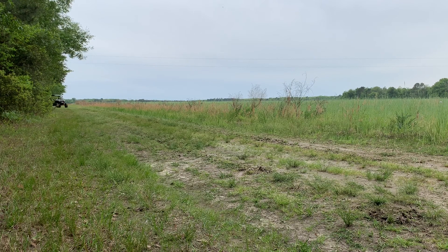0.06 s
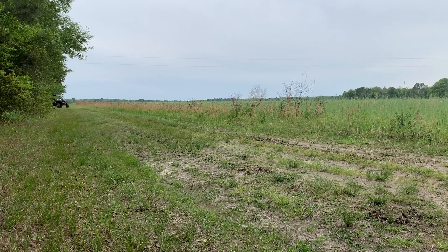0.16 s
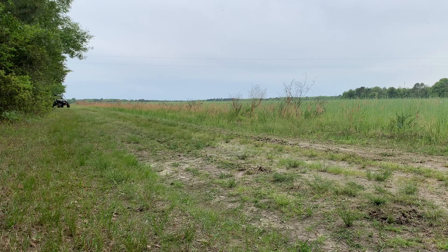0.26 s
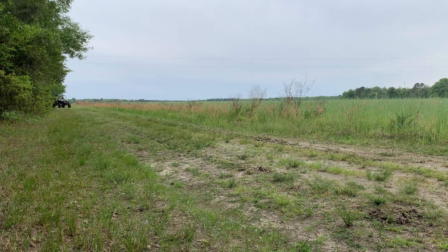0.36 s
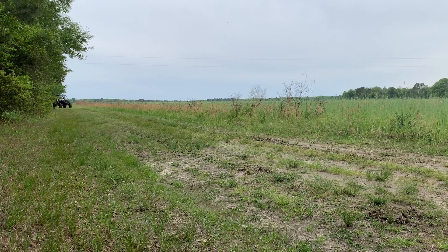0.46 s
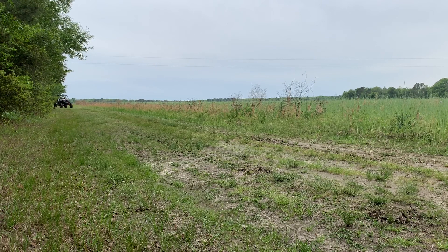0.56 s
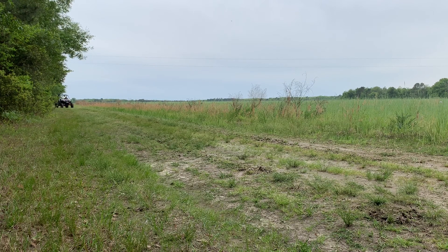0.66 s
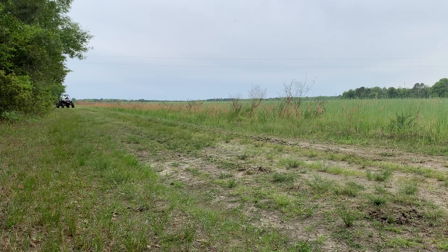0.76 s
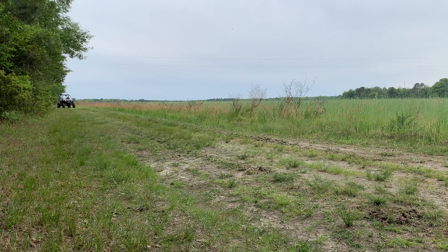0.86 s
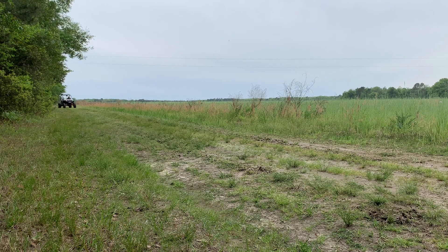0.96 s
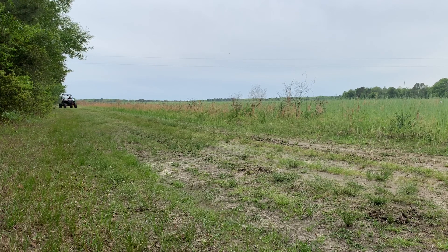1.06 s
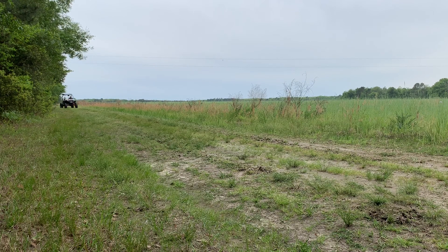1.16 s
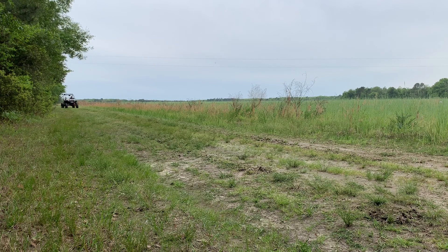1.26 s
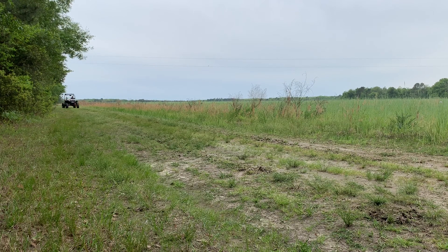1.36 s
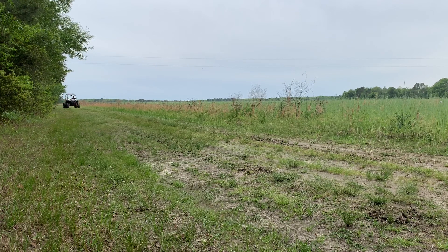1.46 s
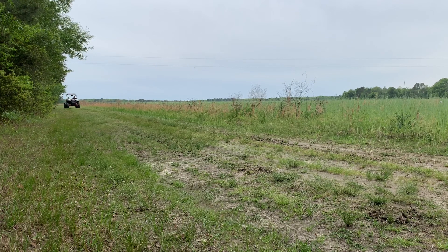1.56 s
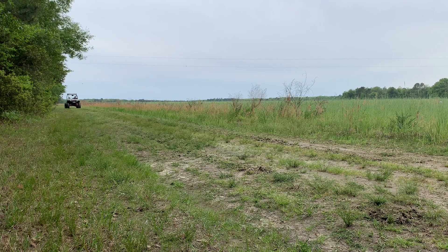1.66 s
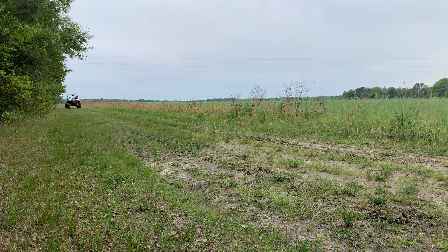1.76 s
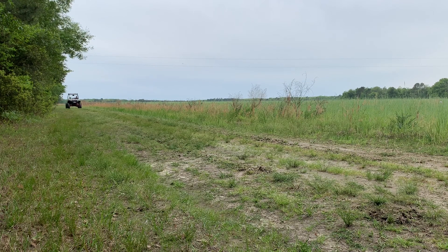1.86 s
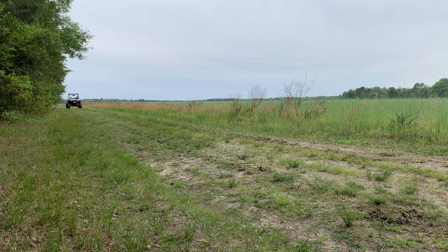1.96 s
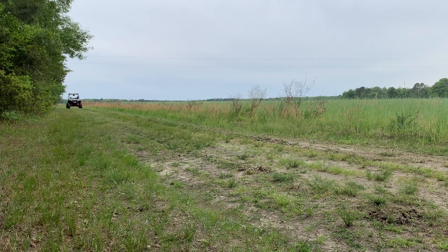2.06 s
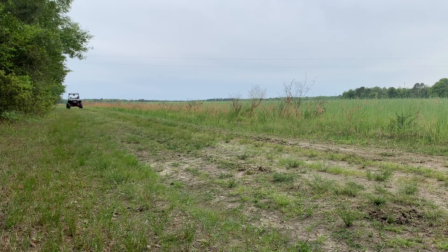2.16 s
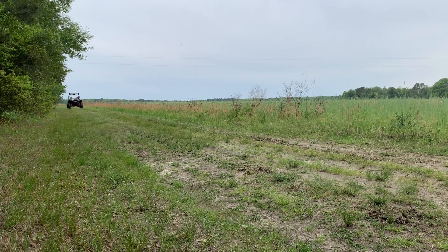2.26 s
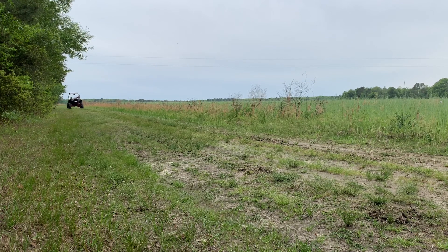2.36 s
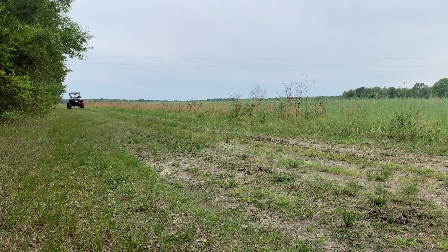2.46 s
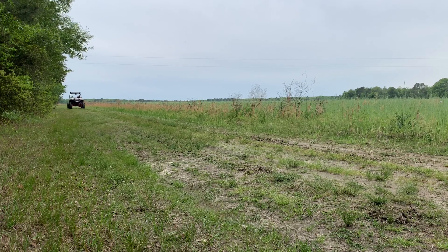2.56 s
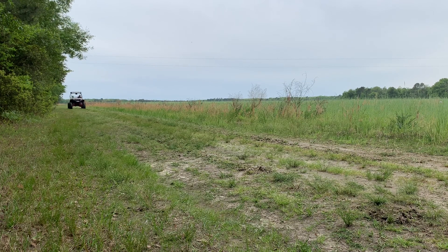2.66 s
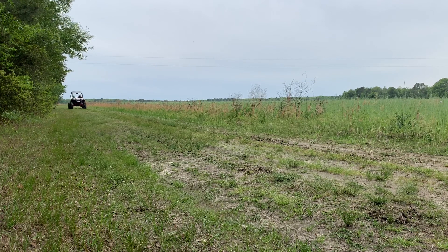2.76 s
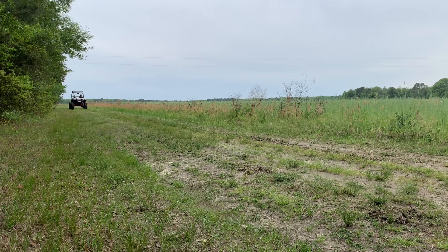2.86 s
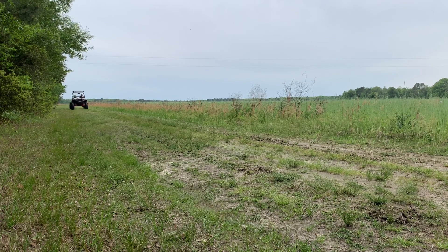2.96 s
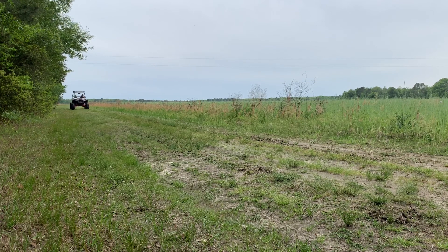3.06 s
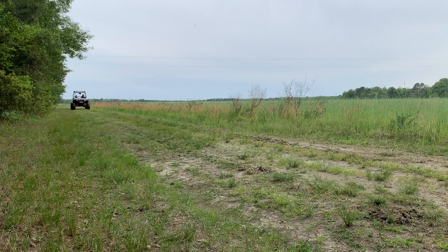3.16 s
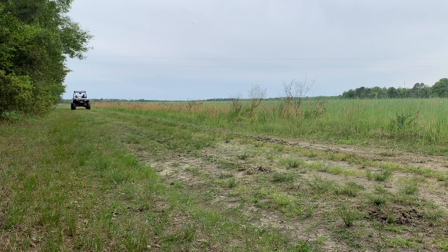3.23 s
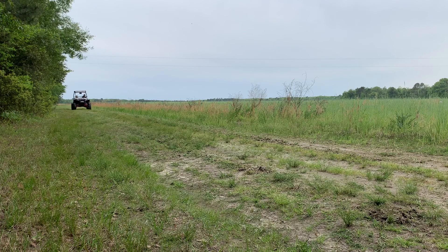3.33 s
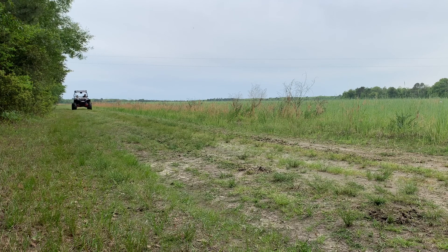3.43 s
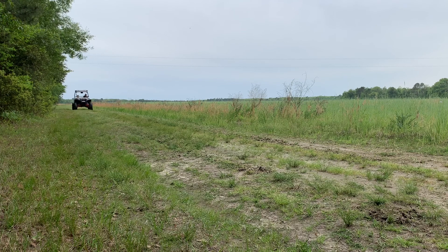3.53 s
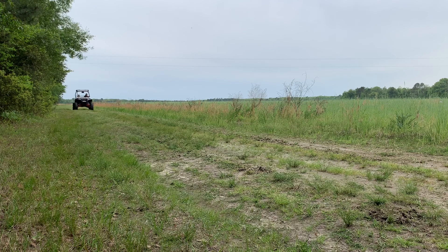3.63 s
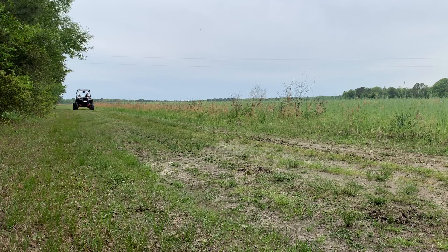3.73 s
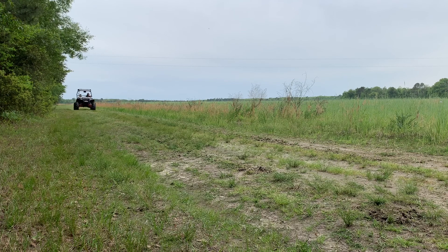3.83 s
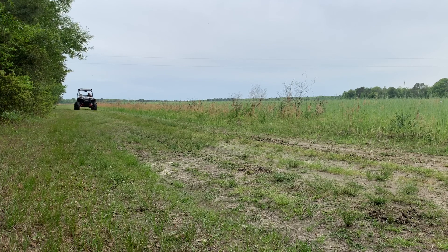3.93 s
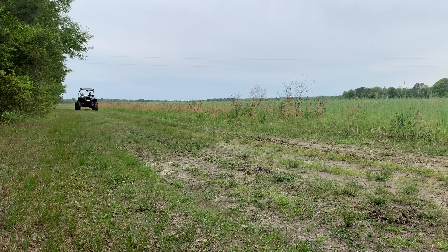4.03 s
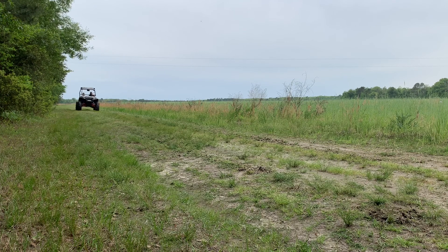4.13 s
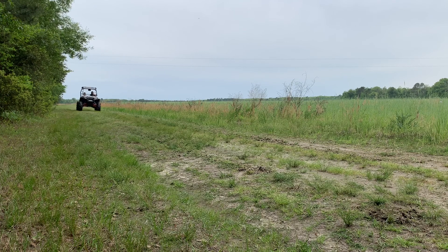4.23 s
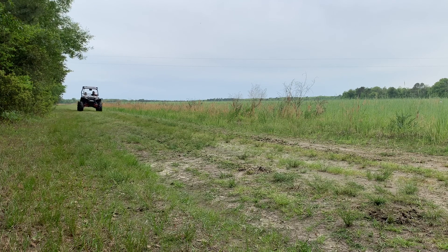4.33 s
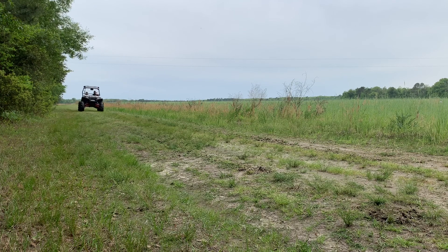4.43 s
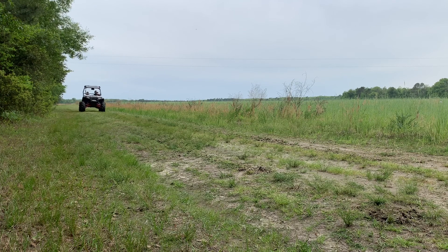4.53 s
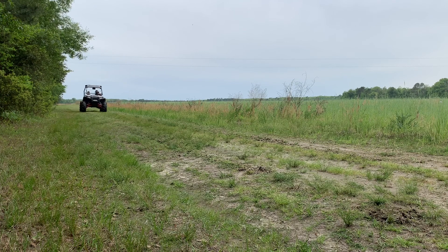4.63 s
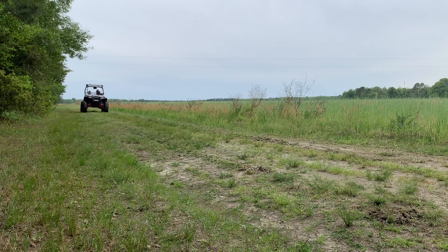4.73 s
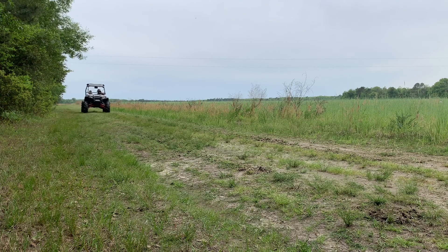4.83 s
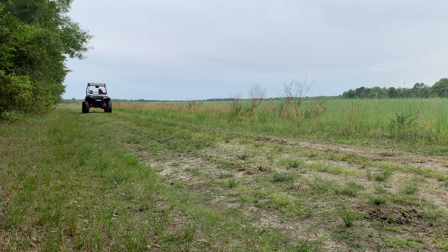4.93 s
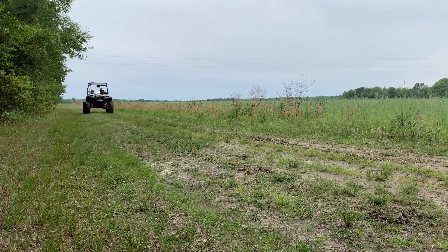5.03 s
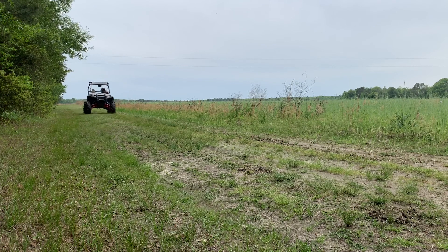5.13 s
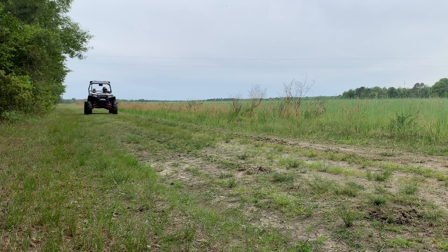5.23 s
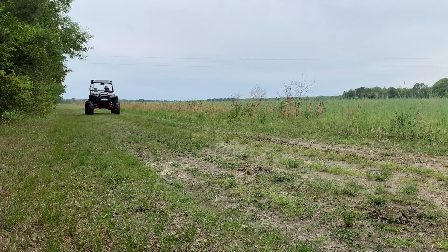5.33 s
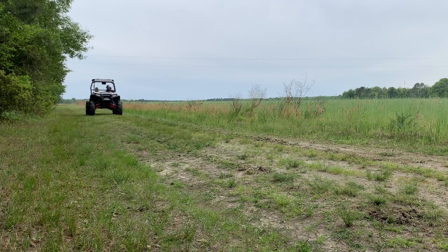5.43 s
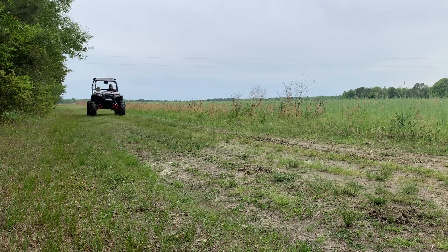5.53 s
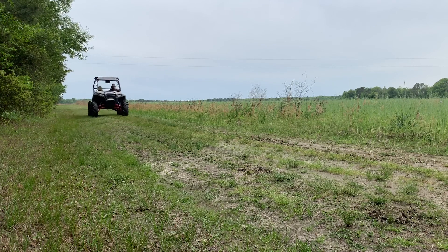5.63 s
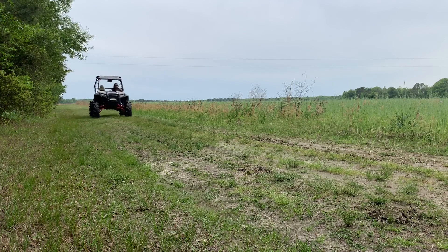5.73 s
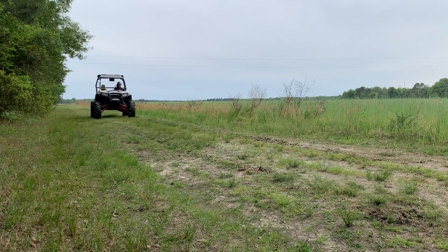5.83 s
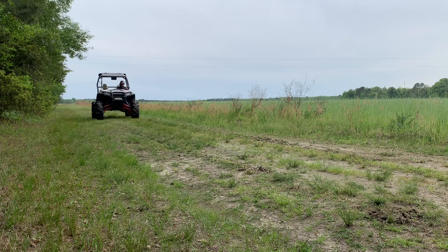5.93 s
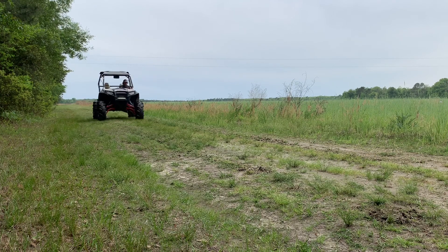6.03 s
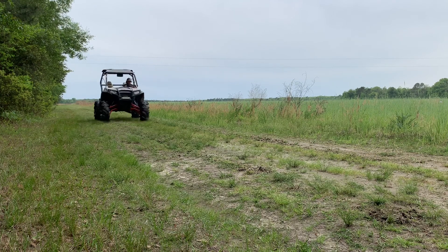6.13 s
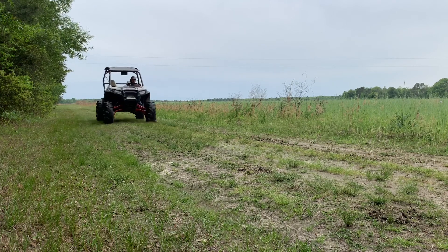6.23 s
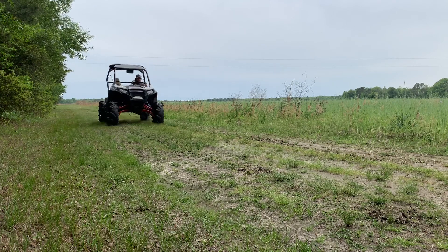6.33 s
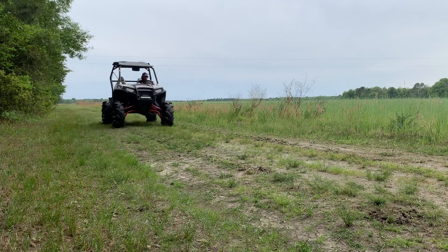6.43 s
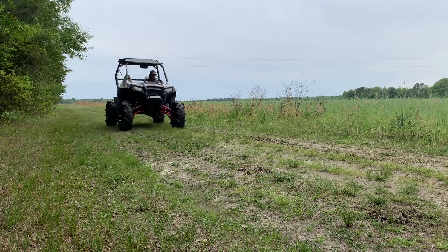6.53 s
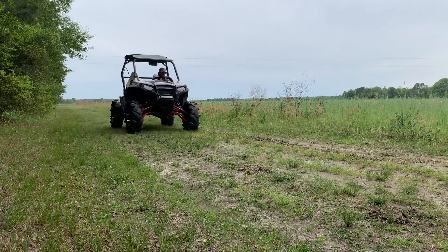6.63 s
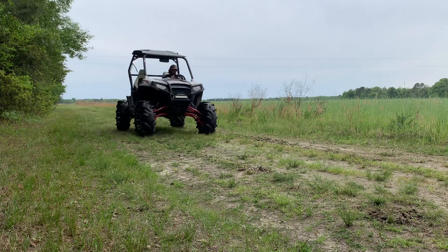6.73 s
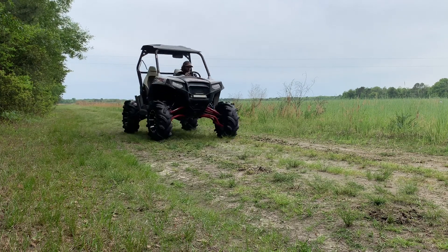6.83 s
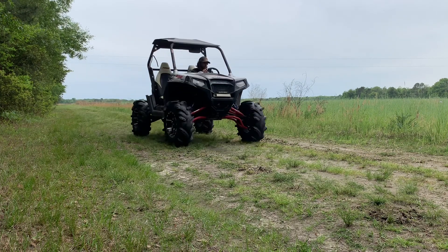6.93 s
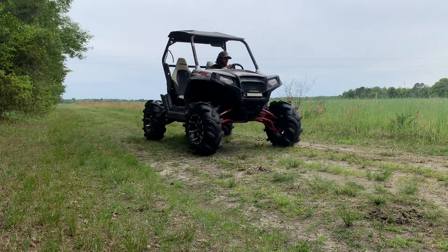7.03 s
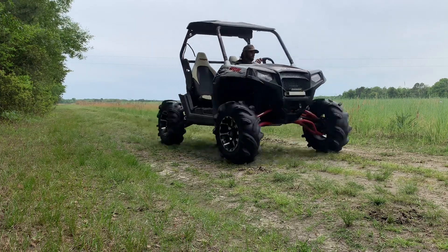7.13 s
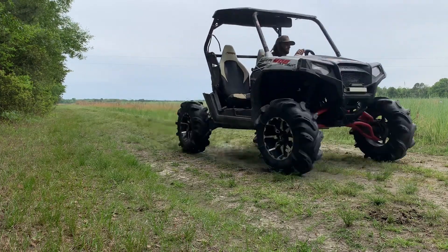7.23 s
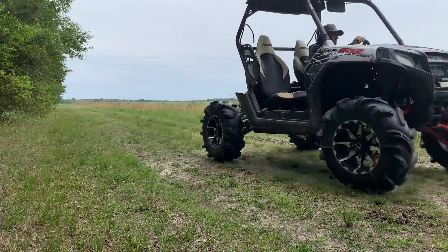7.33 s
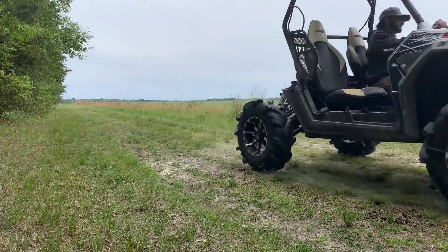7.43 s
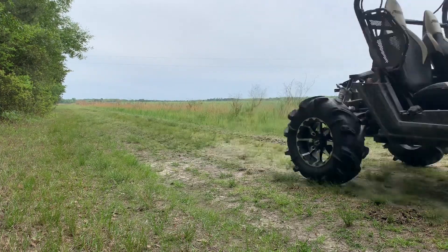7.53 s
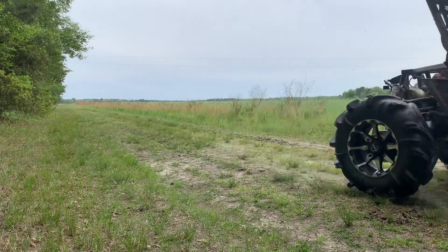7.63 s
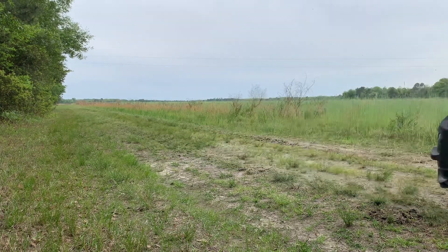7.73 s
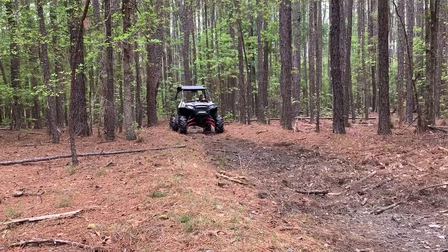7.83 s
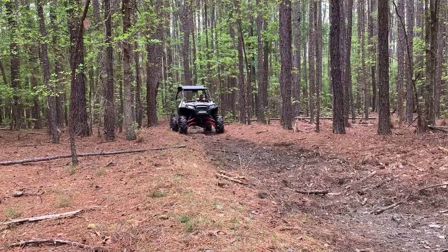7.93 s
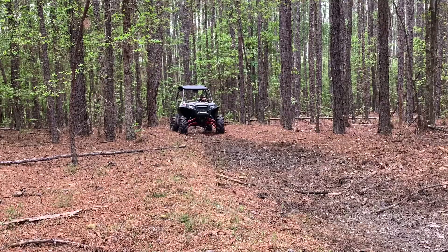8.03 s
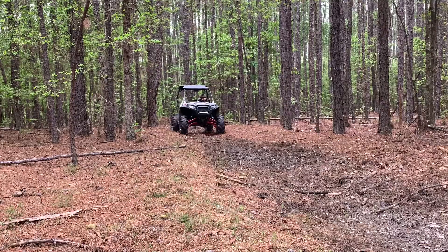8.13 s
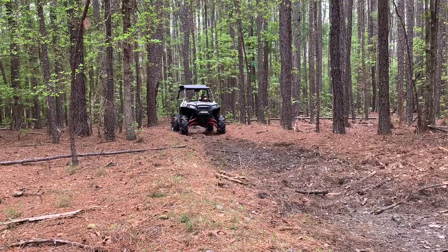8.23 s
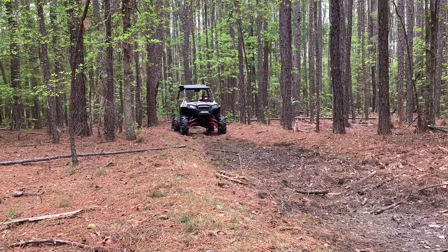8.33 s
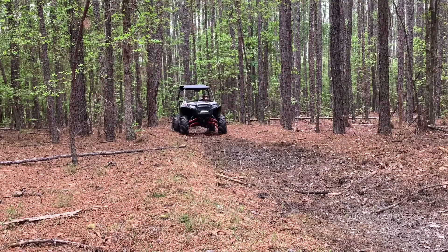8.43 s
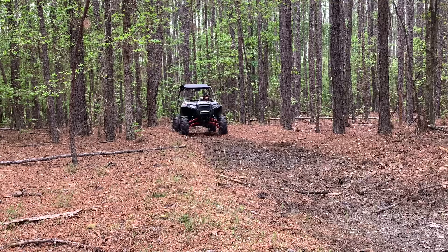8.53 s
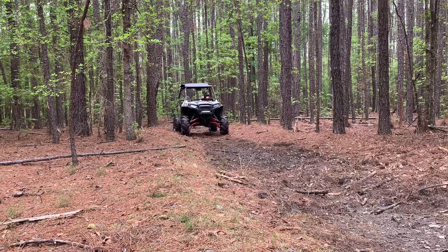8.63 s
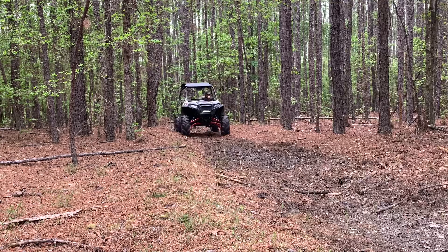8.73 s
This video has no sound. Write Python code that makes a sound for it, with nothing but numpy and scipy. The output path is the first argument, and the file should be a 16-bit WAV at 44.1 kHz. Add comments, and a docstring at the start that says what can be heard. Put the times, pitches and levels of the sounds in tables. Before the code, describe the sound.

From 0 s a small two-cylinder buggy engine is heard far off to the left in an open field, a soft muffled drone over faint hiss. It revs higher through 1 to 3.5 s, becoming louder and raspier, with a slight dip near 3.5 s. Tiny grass and grit ticks appear. Around 4.7 s the pitch sags, then recovers by 5.3 s as the roar builds. At 6.5 s the throttle shuts: the note falls, uneven and burbling, with small pops from 6.6 to 6.9 s and a thin gear whine. From 7 to 7.7 s it coasts past close and to the right, deep pulsing exhaust, sinking whine, crunchy tyre swish and snaps. At 7.8 s a quick dip leads to a wood, where the engine chugs low and slow, steadier and less hissy, rising slightly and brightening until about 8.8 s. Phone-like stereo sound.

```python
"""A two-cylinder off-road buggy revs across a grass field toward a phone, lifts off the throttle and rolls
past on the right, gears whining; a quick fade leads to the same buggy pulling slowly through a pine wood.
The exhaust note is a stack of orders (multiples) of the engine cycle, shaped by pipe resonances.
Around it, shaped noise makes roar, tyre hiss, fizz and the close tread; short decaying rings make the ticks."""
import sys
import numpy as np
from scipy import signal
from scipy.io import wavfile
from scipy.ndimage import uniform_filter1d

SR = 44100
rng = np.random.default_rng(int(sys.argv[2]) if len(sys.argv) > 2 else 0)


def persist_wave(psi):
    """Save psi, clipped to +-1, as 16-bit WAV."""
    counts = np.round(np.clip(psi, -1, 1) * 32767).astype(np.int16)
    wavfile.write(sys.argv[1], SR, np.atleast_2d(counts).T)


N = 387198
TIME = np.arange(N) / SR


def gain_of(db):
    """Decibels to an amplitude factor."""
    return 10 ** (np.asarray(db) / 20)


def evened(x):
    """Scales a signal to an RMS of one."""
    return x / np.sqrt(np.mean(abs(x) ** 2) + 1e-20)


def smoothed(x, size, axis=-1):
    """Running mean over size points."""
    return uniform_filter1d(x, size=size, axis=axis)


def read(points, hz):
    """Reads a (Hz, value) curve, straight between its points on a log frequency scale."""
    f, value = np.transpose(points)
    return np.interp(np.log(hz + 1), np.log(f + 1), value)


def columns(rows, at=TIME):
    """Reads every column after the first, straight between the rows."""
    first, *rest = np.transpose(rows)
    return [np.interp(at, first, column) for column in rest]


# Place of the buggy: time_s, nearness (0 far left, 1 close on the right)
BEARING = [(0, 0), (6, 0.0029), (6.75, 0.47), (7.25, 0.65), (7.6, 1), (7.8, 1), (7.82, 0.46), (8.78, 0.34)]


def nearness(t=TIME):
    """How close the buggy is, which steers the stereo picture and several levels."""
    return np.clip(columns(BEARING, t)[0], 0, 1)


# Level between the phone's two microphone ports, far and close: pitch_hz, left_minus_right_db
TILT_FAR = [(60, -4), (110, -1.5), (200, -2.5), (380, -2.5), (700, 3.5), (1290, 2), (2380, -0.5),
            (4400, -2.5), (8120, 1), (15000, -0.5)]
TILT_NEAR = [(60, 1), (110, -5), (200, -2.5), (380, -4.5), (700, -6.5), (1290, -3), (2380, -0.5),
             (4400, -11), (8120, -2), (15000, 0.5)]
# Phase between the ports, far and close: pitch_hz, left_lead_radians
LEAD_FAR = [(0, 0), (1380, 1.6), (1720, 3), (3010, 3.4), (4480, 5.8), (6200, 5.2), (7300, 2.8), (9000, .1),
            (15300, -9)]
LEAD_NEAR = [(0, 0), (1980, -1.2), (2930, -1.5), (4390, .6), (5680, 4.4), (7300, 2.8), (9000, .1),
             (15300, -9)]
# Likeness of the two ports: pitch_hz, likeness (0 unrelated, 1 the same)
LIKENESS = [(100, 1), (600, 0.99), (1400, 0.6), (3000, 0.59), (6000, 0.44), (9000, 0.8), (15000, 0.65)]


def ports(spectra, size):
    """Turns short-time spectra (shared, unshared) into the two microphone signals by level, phase and likeness."""
    shared, unshared = spectra
    hop = size // 4
    hz = np.fft.rfftfreq(size, 1 / SR)
    near = nearness(np.arange(shared.shape[-1]) * hop / SR)

    def blend(far, close):
        return np.outer(far, 1 - near) + np.outer(close, near)

    lead = blend(columns(LEAD_FAR, hz)[0], columns(LEAD_NEAR, hz)[0])
    tilt_db = blend(read(TILT_FAR, hz), read(TILT_NEAR, hz))
    same = np.clip(read(LIKENESS, hz), 0, 1)[:, None]
    left = shared * gain_of(tilt_db / 2)
    right = (same * shared + np.sqrt(1 - same ** 2) * unshared) * np.exp(-1j * lead)
    right = right * gain_of(-tilt_db / 2)
    return signal.istft(np.array([left, right]), nperseg=size, noverlap=size - hop)[1][:, :N]


def noise(spectrum, patchy_db, flicker_db, size=512):
    """Random short-time spectra with drifting patches and a flicker shared by all bins."""
    frames = N // (size // 4) + 5
    hz = np.fft.rfftfreq(size, 1 / SR)
    a, b, c, d, patches = rng.standard_normal((frames, len(hz), 5)).T
    patches = evened(smoothed(smoothed(patches, 8, axis=0), 16, axis=1))
    flicker = evened(smoothed(rng.standard_normal(frames), 12))
    shape = gain_of(read(spectrum, hz)[:, None] + patchy_db * patches + flicker_db * flicker)
    return evened(ports(np.array([a + 1j * b, c + 1j * d]) * shape, size))


def crackle(per_s, spread_db):
    """Sparse sharp swells, as tyre lugs tear grass and throw grit."""
    size = gain_of(spread_db * np.minimum(rng.exponential(1, N), 4))
    hits = size * (rng.random(N) < per_s / SR)
    swell = signal.lfilter([1], [1, -np.exp(-1 / (0.003 * SR))], hits)  # 3 ms decay
    return evened(1 + 0.093 * smoothed(smoothed(swell, 30), 30))


# Colour of the airy top: pitch_hz, density_db (per Hz, relative)
TOP = [(11000, -92.5), (12000, -62), (12500, -7), (13000, -3.5), (15200, -7.5), (15800, -4.5)]


def airy_top(fizz_db, grit):
    """The highest treble; air dulls it first, so it sinks faster than the fizz at low levels."""
    top_db = fizz_db - 2.0 + .35 * np.minimum(fizz_db + 52.5, 0)
    return gain_of(top_db) * grit * noise(TOP, patchy_db=2.5, flicker_db=1.2)


# Colour of the fizz: pitch_hz, density_db (per Hz, relative)
FIZZ = [(5000, -73), (6500, -29), (7500, -0.5), (8300, 3), (10500, 0), (11000, 1.5), (11300, -59),
        (12000, -91)]
FIZZ_DB, FIZZ_NEAR_DB = -3, -3.5  # against the hiss, and the change close by
FIZZ_KNEE_DB, FIZZ_LOSS = -47, .9  # below this hiss level, extra dB lost per dB: air eats the fizz


def fizz(hiss_db, near, gusts):
    """Gritty treble that follows the tyre hiss, together with its airy top."""
    fizz_db = hiss_db + FIZZ_DB + FIZZ_LOSS * np.minimum(hiss_db - FIZZ_KNEE_DB, 0) + FIZZ_NEAR_DB * near
    grit = gusts * crackle(40, 8.1)
    body = gain_of(fizz_db) * grit * noise(FIZZ, patchy_db=1.5, flicker_db=1.5)
    return body + airy_top(fizz_db, grit)


# Course of the tyre and engine hiss, in field and wood: time_s, level_db (reference for hiss, tread and fizz)
HISS_FIELD = [(0.03, -64.5), (1.28, -57), (2.21, -57), (4.27, -48), (4.99, -52), (5.27, -48.5), (6.52, -45),
              (7.38, -35.5), (7.44, -36.5), (7.51, -33), (7.77, -30.5)]
HISS_WOOD = [(7.85, -46.5), (8.65, -45), (8.77, -43)]


def hiss_level(later):
    """Reference level of the hiss through both places."""
    return np.where(later, columns(HISS_WOOD)[0], columns(HISS_FIELD)[0])


# Colour of the hiss: pitch_hz, density_db (per Hz, relative)
HISS = [(400, -60.5), (700, -7), (1500, -2.5), (2600, -4.5), (3500, -9.5), (4500, -10.5), (6300, -14.5),
        (7300, -14.5), (8500, -29), (10000, -88)]


def hiss(hiss_db, near, gusts):
    """Tyre and engine hiss: noise with dense, shallow crackle."""
    level = gain_of(hiss_db + 5.0 - 5.5 * near)
    return level * gusts * crackle(60, 1.3) * noise(HISS, patchy_db=1.5, flicker_db=1.0)


# Colour of the tyre tread close by: pitch_hz, density_db (per Hz, relative)
SWOOSH = [(600, -47.5), (1100, 0.5), (1800, 0.5), (2600, -1.5), (3100, -16.5), (4000, -56)]
WHEEL_S, WHEEL_FADE_DB_PER_S = 7.54, 33  # the rear wheel is closest, then its tread fades


def tread_swoosh(hiss_db, near, gusts, later):
    """Tyre tread, heard more strongly the nearer the buggy comes."""
    gone_db = WHEEL_FADE_DB_PER_S * np.maximum(TIME - WHEEL_S, 0) * ~later
    level = gain_of(hiss_db + 3.0 - gone_db) * np.sqrt(near)
    return level * gusts * crackle(150, 4.5) * noise(SWOOSH, patchy_db=2.0, flicker_db=0.5)


# Small snaps and squeaks: start_s, peak_db (nominal), pitch_hz, t60_s, overtone_db (against the ring)
TICKS = [(1.737, -51, 6570, 0.051, -28), (1.803, -43, 4020, 0.045, -10), (1.972, -51, 4100, .04, -20),
         (2.43, -55, 4850, 0.095, -23), (4.246, -27, 3376, 0.015, -13), (5.251, -36, 8044, 0.023, -13),
         (6.767, -31, 3164, 0.031, -17), (7.381, -34, 3030, 0.017, 0), (7.487, -32, 6400, 0.058, -15),
         (7.521, -32, 4400, 0.038, -22), (7.73, -35.5, 4367, 0.032, 4), (7.772, -29, 5076, 0.028, 2),
         (8.44, -46, 3920, 0.091, -27)]


def ticks():
    """Small snaps and squeaks of stems, grit and bodywork: short rings with overtones."""
    out, t = np.zeros(N), np.arange(2000) / SR
    soft = np.minimum(t / .001, 1) * np.minimum((t[-1] - t) / .01, 1)  # rounded start and end
    for start_s, peak_db, pitch_hz, t60_s, overtone_db in TICKS:
        turn = 2 * np.pi * pitch_hz * t
        third = np.sin(3 * turn) * (6 * pitch_hz < SR)  # left out where it would alias
        ring = np.sin(turn) + gain_of(overtone_db) * (np.sin(2 * turn) + third)
        ring = ring * (1 + .4 * evened(smoothed(rng.standard_normal(len(t)), 40)))
        decay = gain_of(peak_db - 60 * t / max(t60_s, .005))
        part = out[round(start_s * SR):][:len(t)]
        part += (decay * soft * ring)[:len(part)]
    return out


# Two stretches of gear tone: time_s, pitch_hz, level_db (before the waver)
WHINE = [
    [(6.66, 916, -39), (6.732, 971.6, -36), (6.77, 980, -50)],
    [(6.94, 923, -41.5), (7.232, 906, -34), (7.436, 828.7, -34.5), (7.468, 814.9, -28), (7.53, 811, -38)],
]


def whine():
    """Thin gear tones, the second sinking as the buggy slows and passes."""
    out = np.zeros(N)
    for rows in WHINE:
        hz, db = columns(rows)
        first_s, last_s = rows[0][0], rows[-1][0]
        on = np.interp(TIME, [first_s - .02, first_s, last_s, last_s + 0.017], [0, 1, 1, 0])
        waver = 1.2 + .12 * evened(smoothed(rng.standard_normal(N), 900))
        out += np.sqrt(2) * on * gain_of(db) * waver * np.sin(2 * np.pi * np.cumsum(hz) / SR)
    return out


# Colour of the roar: pitch_hz, density_db (per Hz, relative)
ROAR = [(150, -66.5), (250, -29), (450, 6), (700, -1), (1050, -3.5), (1400, -14), (2000, -17),
        (3000, -34.5), (5000, -82)]
ROAR_DB, ROAR_WOOD_DB, ROAR_NEAR_DB = -22.5, -24, 4  # against the note, before 3.5 dB and the puffs
ROAR_PER_BRIGHT = 0.48  # dB of roar per dB of brightness in the field


def roar(near, puffs, gusts, later):
    """Broad roar that rises with the note and, in the field, with its brightness."""
    _, field_db, bright_db = columns(FIELD)
    brighter_db = ROAR_PER_BRIGHT * (bright_db - FIELD_BRIGHT_DB)
    in_field_db = field_db + ROAR_DB + brighter_db + ROAR_NEAR_DB * near
    roar_db = np.where(later, columns(WOOD)[1] + ROAR_WOOD_DB, in_field_db)
    level = gain_of(roar_db + 3.5) * (0.62 + 0.099 * puffs)
    return level * gusts * noise(ROAR, patchy_db=1.0, flicker_db=0.6)


# Pipe ring ahead of the low thump: time_s, ring_from_order, lead_cycles
PULSE = [(0, 2.2, .6), (.4, 2.2, .6), (1, 3.9, .5), (6.45, 3.9, .5), (6.9, 1.65, .8), (7.8, 1.65, .8),
         (7.81, 2.3, .7)]
# Off the throttle, one entry per order from 1 up: level_db against the note
COASTING = [-3, -4.5, -5, -12.5, -9.5, -16, -19.5, -23, -23.5, -32, -33.5, -39, -45, -42, -41]
# Leftover fuel lights in the pipe: time_s, lift_db of orders 3 and up
POPS = [(6.611, 10), (6.8, 7), (6.889, 4)]
# Corners of the change of place, in s: field fade starts, ends, wood fade starts, ends
FADE_S = 7.778, 7.806, 7.81, 7.84
POP_S = .025  # time from a pop's peak to 1/e of its lift
SHUT_S, STEADIER_S, SWING_S = 6.5, 7.27, .04  # throttle shuts; firing steadies; half the time either takes
ROUGH_PULL, ROUGH_SHUT, ROUGH_SLOW, ROUGH_PAST, ROUGH_WOOD = .1, .3, .55, .16, .08  # uneven firing, share
RING_ORDER, RING_TRADE = 5, 0.44  # loudest pipe ring sinks by this share of what the lowest order gains
BRIGHT_FROM_HZ, BRIGHT_AT_HZ = 280, 800  # brightness tilts the orders between these
WOBBLE, DRIFT_DB = .0025, .7  # over bumps the speed wavers (share) and each order drifts


def bumps():
    """Random drift with a new value every 60 ms."""
    return evened(np.interp(TIME, np.arange(0, 9, .06), rng.standard_normal(150)))


def exhaust(rows, pipe, pattern_db, usual_db, thump_db):
    """Orders of the cycle, timed as a pipe ring and then a thump; each cycle burns a little differently."""
    hz, level_db, bright_db = columns(rows)
    cut = FADE_S[1]
    shutting, steadying = [SHUT_S - SWING_S, SHUT_S + SWING_S], [STEADIER_S - SWING_S, STEADIER_S + SWING_S]
    shut = np.interp(TIME, shutting, [0, 1]) * (TIME <= cut)
    rough = np.interp(TIME, shutting + steadying + [cut, cut + SWING_S],
                      [ROUGH_PULL, ROUGH_SHUT, ROUGH_SLOW, ROUGH_PAST, ROUGH_PAST, ROUGH_WOOD])
    pop_db = sum(db * np.exp(-((TIME - s) / POP_S) ** 2) for s, db in POPS)
    hz = hz * (1 + WOBBLE * bumps())
    turns = np.cumsum(hz) / SR
    ring_order, lead = columns(PULSE)
    firings = np.arange(int(2 * turns[-1]) + 2) / 2  # two firings a cycle

    def chance():
        return np.interp(turns, firings, rng.standard_normal(len(firings)))

    strength, late = chance(), chance()  # shared by all orders
    note, ahead = np.zeros(N), -1.
    for k in range(1, len(pattern_db) + 1):
        tilt = np.interp(np.log(k * hz), np.log([BRIGHT_FROM_HZ, BRIGHT_AT_HZ]), [0, 1])
        tilt_db = (bright_db - usual_db) * tilt
        trade_db = thump_db * ((k == 1) - RING_TRADE * (k == RING_ORDER))
        pulling_db = columns(pipe, k * hz)[0] + tilt_db + pattern_db[k - 1] + trade_db
        coasting_db = COASTING[k - 1] + pop_db * (k > 2)
        db = level_db + DRIFT_DB * bumps() + (1 - shut) * pulling_db + shut * coasting_db
        loose = rough * min(.5 * k, 1)  # the flywheel steadies the lowest order
        size = 1 + loose * (.5 * strength + 1.3 * chance())
        slip = loose * (.1 * k * late + 1.2 * chance())
        note += np.sqrt(2) * gain_of(db) * size * np.cos(2 * np.pi * k * turns + ahead + slip)
        ahead = ahead + np.pi * lead * (1 + np.tanh(1.5 * (k - ring_order)))
    return note, turns + lead


# Drive in the wood: time_s, pitch_hz (engine cycles), level_db (of the note), brightness_db (above the usual)
WOOD = [(7.85, 37.52, -18, -6), (8.062, 37.8, -17.5, 1), (8.24, 42.3, -18.5, -4), (8.524, 42.26, -18, 0),
        (8.76, 45.65, -17.5, 18)]
# Pipe and muffler resonances under power, wood: pitch_hz, level_db (against the note)
WOOD_PIPE = [(38, -28), (46, -18), (76, -1), (91, -1), (120, -11), (137, -4.5), (152, -11.5), (182, -5.5),
             (192, -13.5), (230, -11.5), (270, -9.5), (305, -8), (338, -20), (375, -13), (420, -21.5),
             (470, -28), (520, -42), (600, -46)]
# One entry per order from 1 up, added to the pipe: level_db
WOOD_ORDERS = [7, -0.5, 0, 3.5, 0.5, -3.5, 1.5, -3, 1, -2.5, -4, 2]


def buggy_in_wood():
    """Exhaust of the buggy pulling slowly among the pines."""
    return exhaust(WOOD, WOOD_PIPE, WOOD_ORDERS, usual_db=0, thump_db=0)


# Drive in the field: time_s, pitch_hz (engine cycles), level_db (of the note),
# brightness_db (near 800 Hz against the note)
FIELD = [(0.03, 58.24, -28, -41), (0.44, 60.57, -28, -30), (0.8, 63.9, -23, -29),
         (1.09, 70.05, -22.5, -24.5), (1.47, 73.66, -23, -22), (1.86, 74.43, -21.5, -20),
         (2.77, 75.95, -20.5, -15.5), (3.01, 77.4, -19.5, -18.5), (3.33, 80.2, -18.5, -17.5),
         (3.48, 76.8, -19, -14.5), (3.69, 80.3, -17.5, -17.5), (4.0, 80.7, -17, -15),
         (4.51, 80.14, -15, -17), (4.75, 72.1, -16.5, -23.5), (5.01, 69.76, -14.5, -19.5),
         (5.29, 74, -14, -15), (5.92, 75.65, -12.5, -19), (6.45, 71.24, -11.5, -20),
         (6.52, 67.86, -16, -14), (6.6, 62.4, -18, -13), (6.69, 61.5, -16, -12), (6.78, 62.4, -18.5, -10),
         (6.91, 59.74, -16.5, -12), (7.08, 55.37, -16, -12), (7.4, 50.6, -12.5, -11.5),
         (7.77, 44.93, -12, -17.5)]
# Pipe and muffler resonances under power, field: pitch_hz, level_db (against the note)
FIELD_PIPE = [(55, -5), (66, -7), (75, -4.5), (116, -8), (150, -7.5), (165, -10), (185, -1.5), (212, -5.5),
              (240, -15.5), (275, -15.5), (305, -6.5), (325, -7.5), (355, -3.5), (400, -8.5), (428, -20),
              (465, -11), (500, -16), (530, -13.5), (570, -20.5), (620, -32), (680, -25.5), (750, -27.5),
              (830, -38.5), (900, -31.5), (970, -35), (1050, -33), (1200, -56)]
# One entry per order from 1 up, added to the pipe: level_db
FIELD_ORDERS = [1, 0, 1, 0, 1, -5, -1, 0.5, -1, 3, -3, 0, -4, -0.5, 0.5]
# Lift of the lowest order under power: time_s, level_db
THUMP = [(0, -2), (.5, -1.5), (1, 0), (2.5, 0), (4.5, 0.5), (4.65, -6), (5, -5), (5.4, -1.5), (6.4, -4)]
FIELD_BRIGHT_DB = -21  # usual brightness


def buggy_in_field():
    """Exhaust of the buggy revving toward the phone, then coasting past."""
    return exhaust(FIELD, FIELD_PIPE, FIELD_ORDERS, FIELD_BRIGHT_DB, columns(THUMP)[0])


def scene():
    """Both places in turn: exhaust, whine and ticks at the two ports, over the noises of the drive."""
    field, field_turns = buggy_in_field()
    wood, wood_turns = buggy_in_wood()
    later = TIME > FADE_S[1]
    near = nearness()

    joint = np.minimum(abs(TIME - FADE_S[1]) / .006, 1)  # both notes pass through silence at the change
    engine = np.where(later, wood, field) * joint + whine()
    tones = np.pad([engine, ticks()], ((0, 0), (0, 1024)))
    note, snaps = signal.stft(tones, nperseg=1024, noverlap=768)[2]
    # a copy off the trees, 35 ms late, reaches the ports unequally
    scattered = np.pad(note, ((0, 0), (6, 0)))[:, :-6]

    cycle = np.where(later, wood_turns, field_turns) % 1
    puffs = evened(smoothed(.35 + np.exp(-cycle / .4), 120))  # gas leaves in a burst each cycle
    heard = .1 + .6 * near ** 2  # the bursts stand out as the tailpipe swings round
    gusts = 1 - heard + heard * puffs

    hiss_db = hiss_level(later)
    mix = fizz(hiss_db, near, gusts)
    mix = mix + hiss(hiss_db, near, gusts)
    mix = mix + tread_swoosh(hiss_db, near, gusts, later)
    mix = mix + roar(near, puffs, gusts, later)
    mix = mix + ports(np.array([note + snaps, scattered + snaps]), size=1024)
    return mix * np.interp(TIME, FADE_S, [1, .06, .06, 1])


RUMBLE_HZ, EDGE_HZ = 33, 15650  # lower and upper edge of the phone's band
LIMIT = 1.1  # amplitude that rounded peaks approach


def record(dry):
    """The phone rounds off the tallest peaks and drops the deepest rumble and the highest treble."""
    dry = signal.sosfiltfilt(signal.butter(2, RUMBLE_HZ, "high", fs=SR, output="sos"), dry)
    dry = dry / (1 + (dry / LIMIT) ** 4) ** .25
    lowpass = signal.firwin(1023, EDGE_HZ, window=("kaiser", 9), fs=SR)
    return signal.oaconvolve(dry, lowpass[None], "same")


dry = scene()
out = record(dry)
persist_wave(out)
```